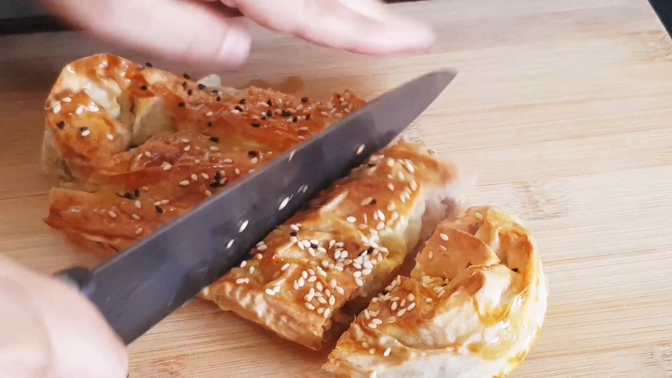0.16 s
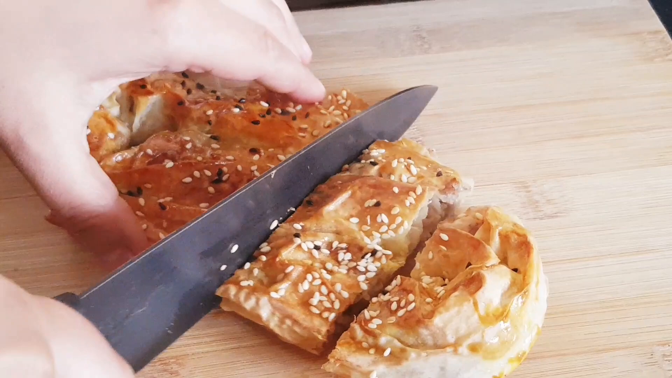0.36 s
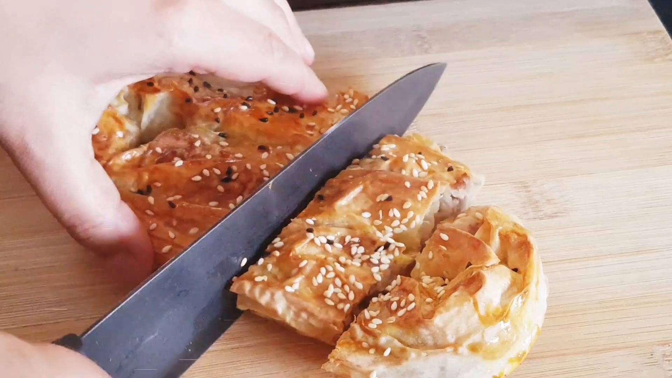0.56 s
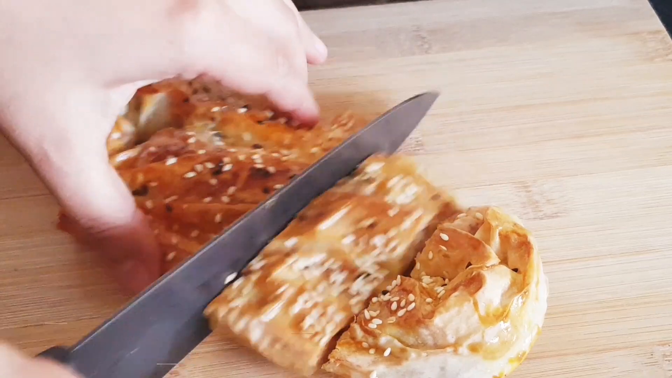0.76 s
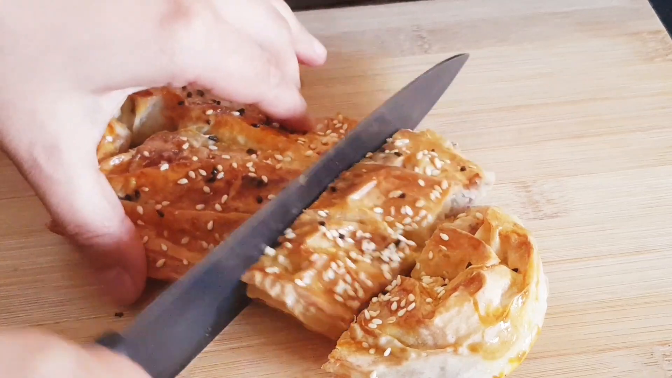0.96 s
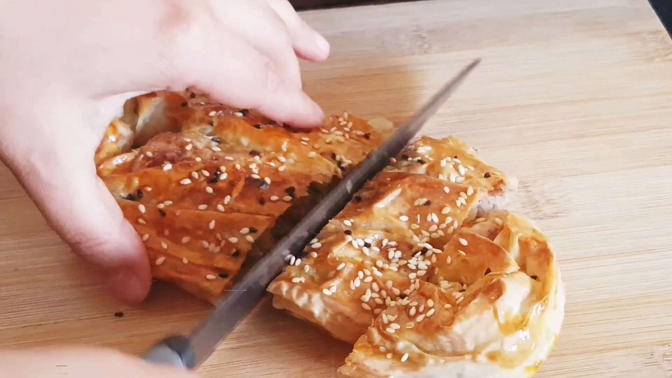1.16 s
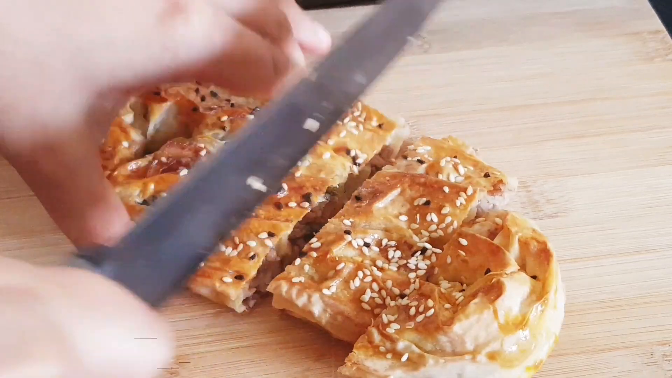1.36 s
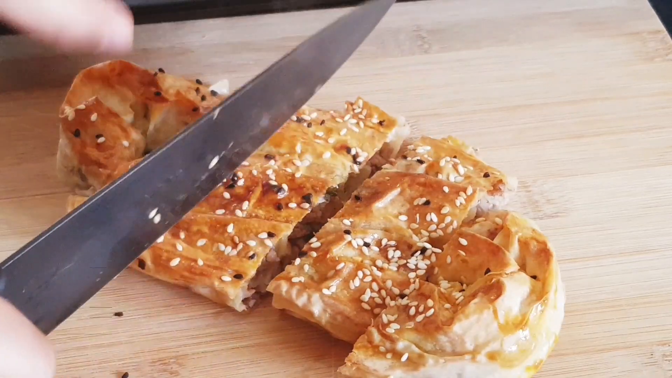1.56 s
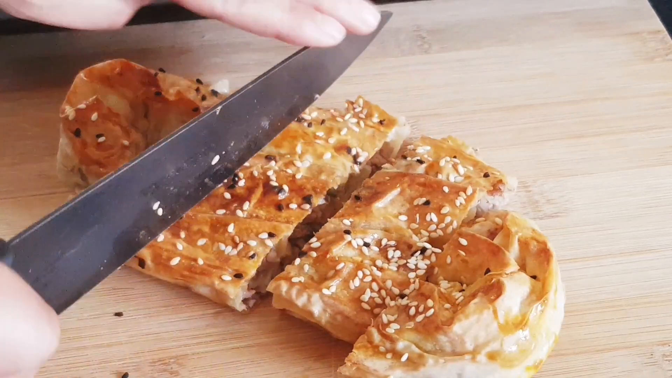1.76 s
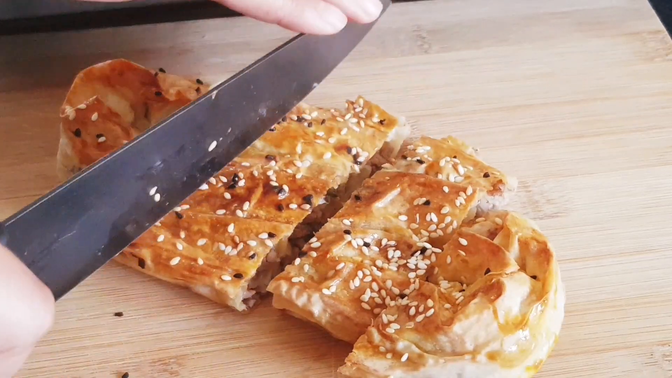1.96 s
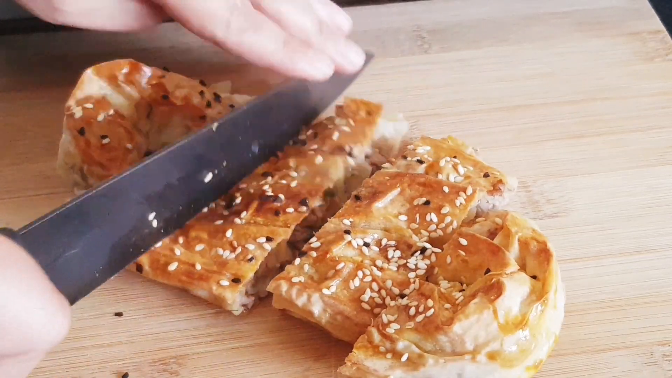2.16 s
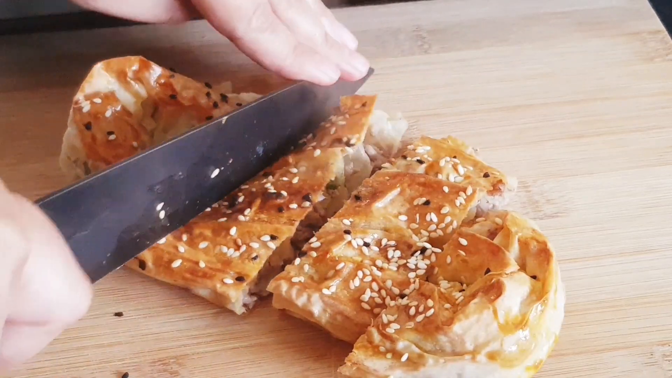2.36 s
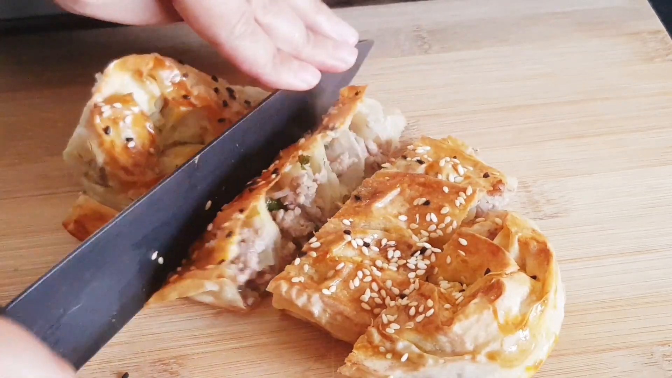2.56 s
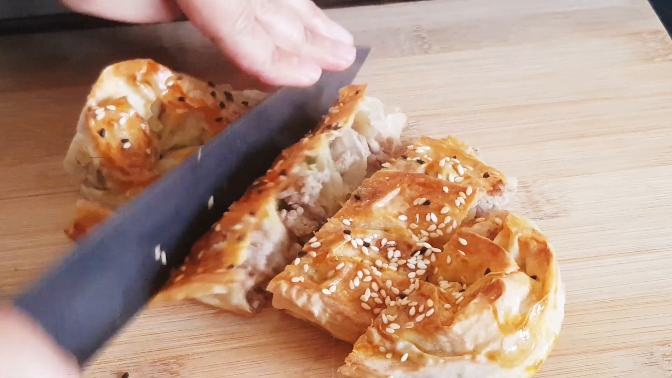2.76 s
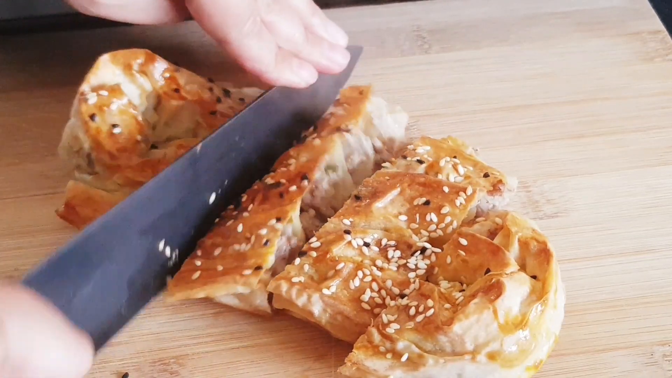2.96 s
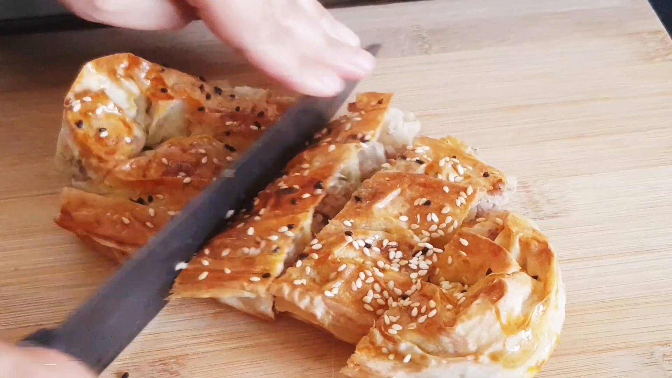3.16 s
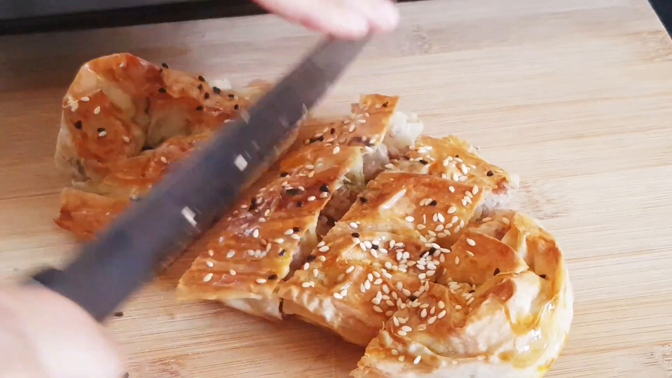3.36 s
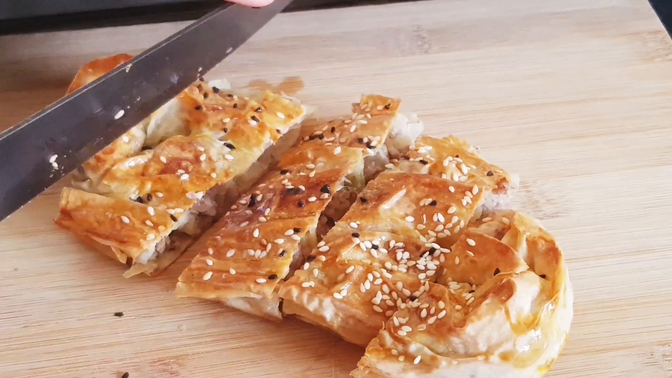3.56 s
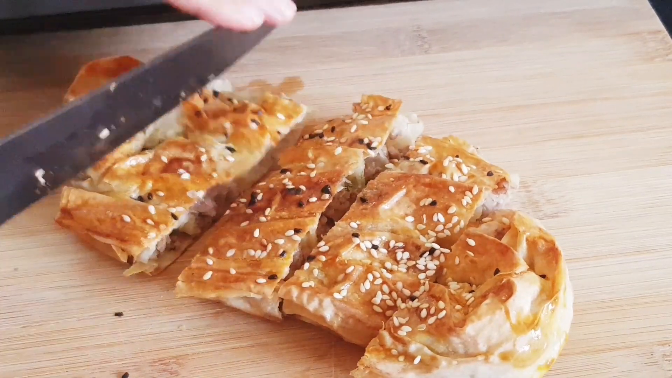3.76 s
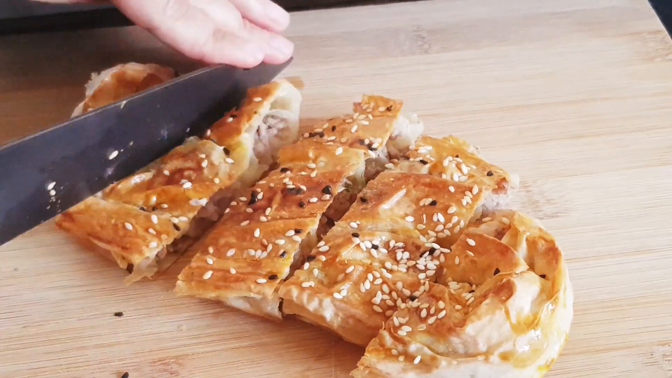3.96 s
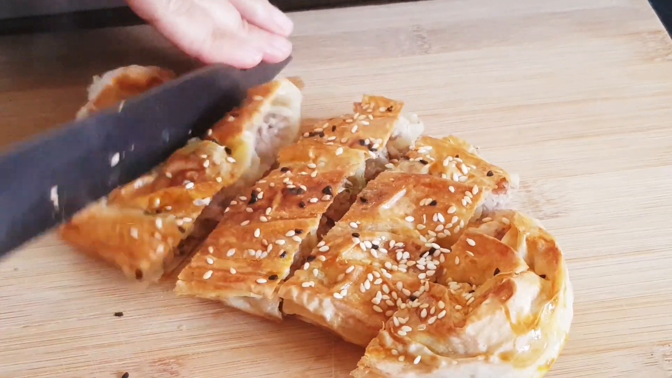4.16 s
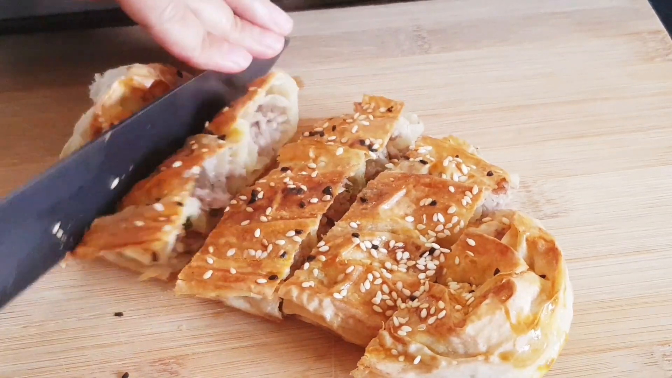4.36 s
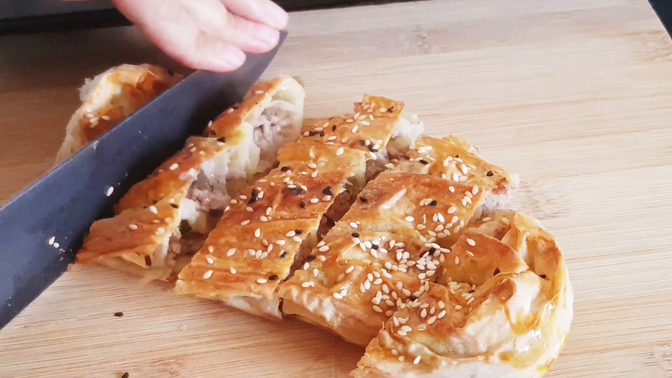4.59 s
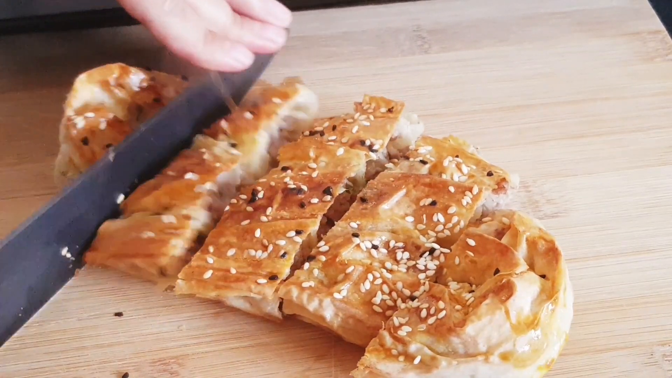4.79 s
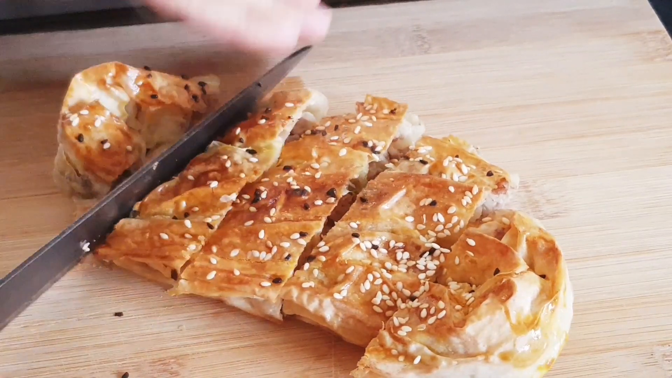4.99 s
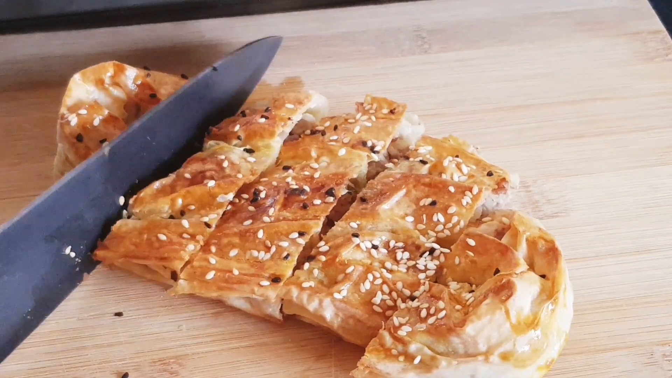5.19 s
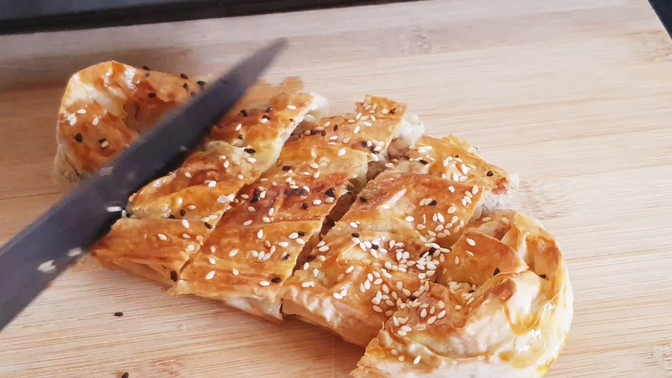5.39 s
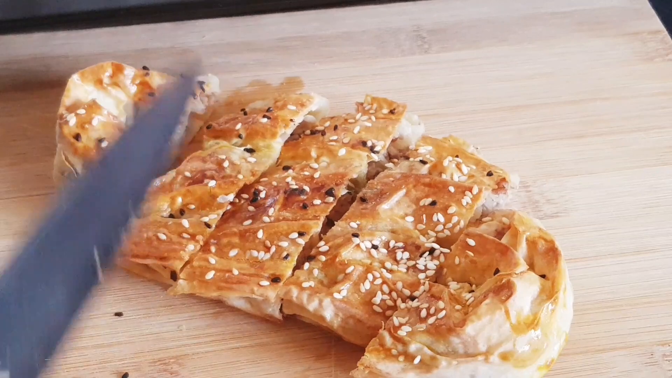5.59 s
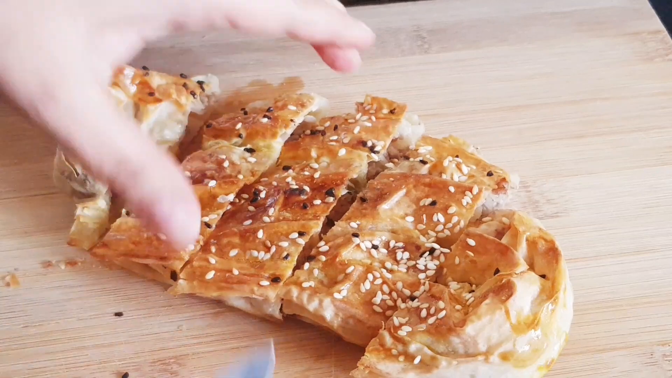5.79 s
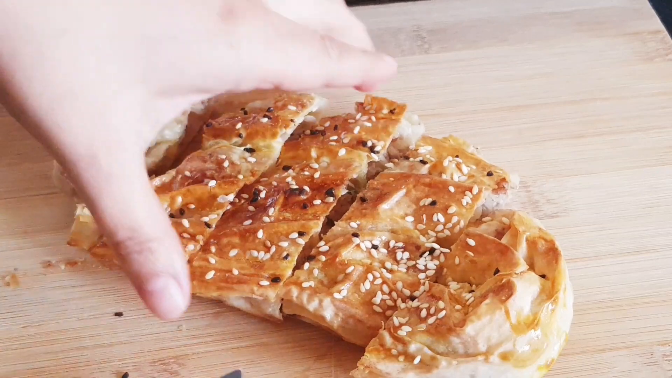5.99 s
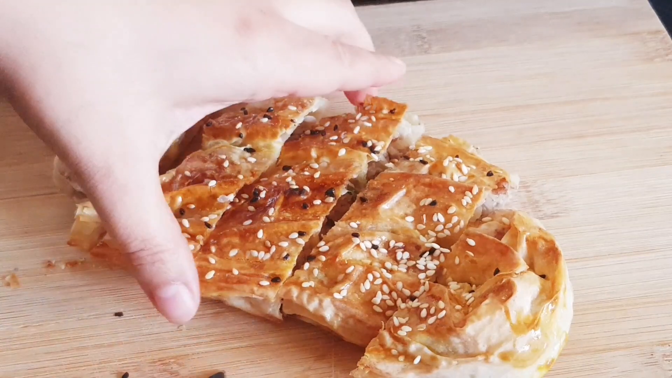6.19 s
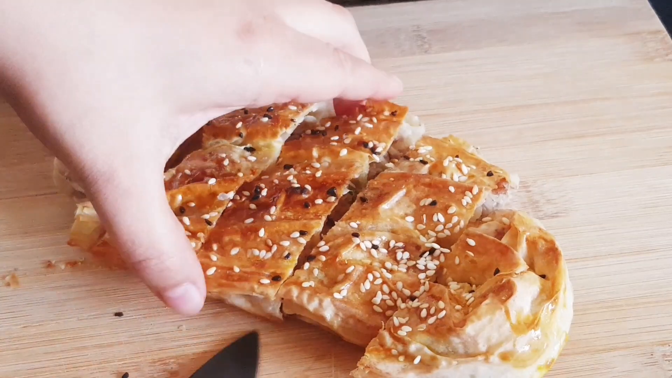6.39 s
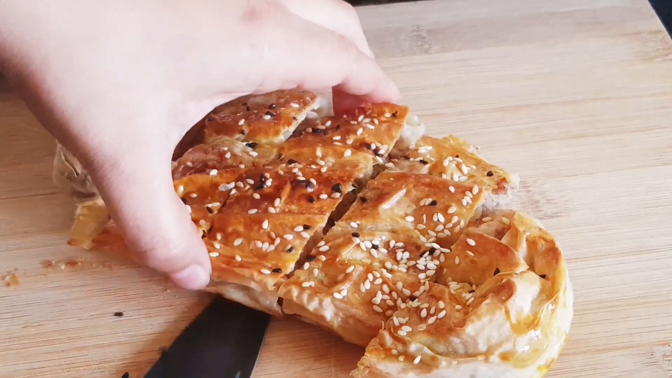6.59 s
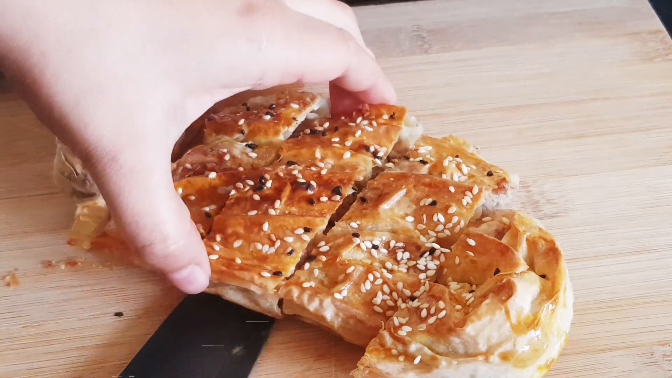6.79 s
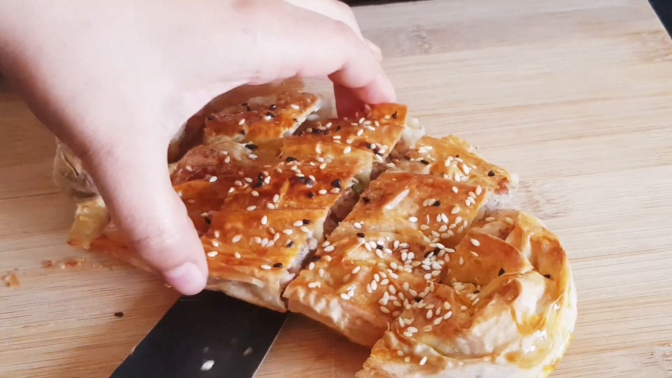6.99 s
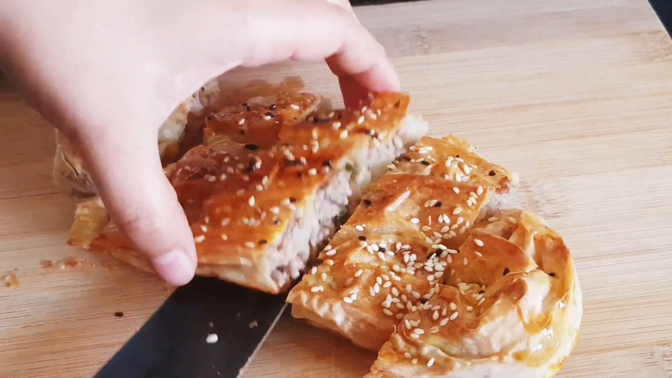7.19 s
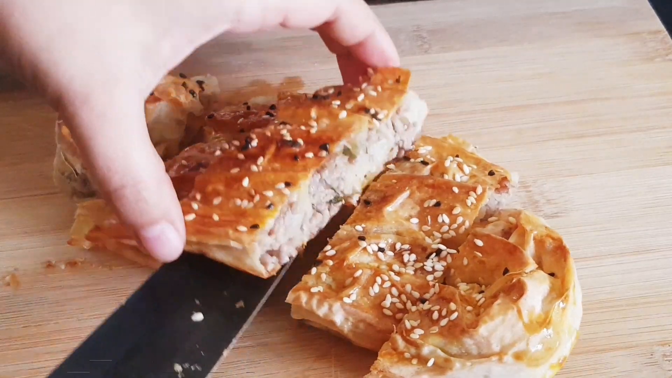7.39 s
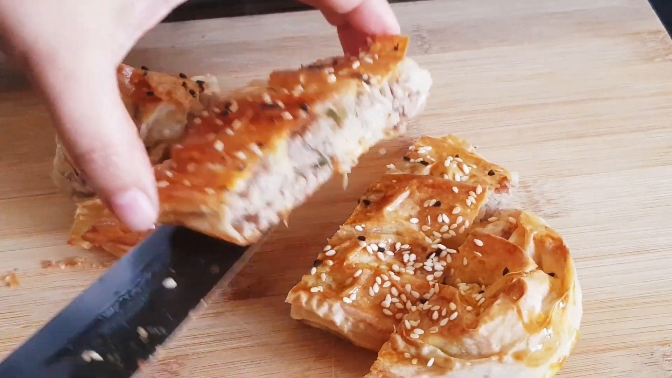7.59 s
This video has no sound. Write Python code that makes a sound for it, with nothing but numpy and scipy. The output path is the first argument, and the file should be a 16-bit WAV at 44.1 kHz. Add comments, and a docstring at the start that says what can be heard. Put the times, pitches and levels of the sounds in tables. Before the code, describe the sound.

A large knife crunches through crisp flaky pastry in three crackling cuts, each ending in a hollow wooden knock, then the blade slides softly.

```python
"""A knife cuts three slices of crisp, flaky pastry on a wooden board, then slides under one to lift it.
Over steady air noise and a wavering low drone, the blade first rubs and a few flakes snap, as filtered noise.
Each push then crushes crust and filling, as trains of random impulses whose level builds until they give.
Each cut ends in a knock on ringing board modes, while dull thuds rock the board on the counter as decaying sines.
Room responses with echoes and a decaying tail surround the pastry, knocks and rubbing, to the last soft slide."""
import sys
import numpy as np
from scipy import signal
from scipy.fft import rfft, irfft, next_fast_len
from scipy.io import wavfile
from scipy.ndimage import uniform_filter1d

SR = 44100
rng = np.random.default_rng(int(sys.argv[2]) if len(sys.argv) > 2 else 0)


def master_out(mix):
    """Clip the mix to full scale and print it as 16-bit PCM to the path in sys.argv[1]."""
    frames = np.transpose(np.atleast_2d(mix))
    ceiling = np.clip(frames, -1, 1)
    pcm = np.round(ceiling * 32767).astype(np.int16)
    wavfile.write(sys.argv[1], SR, pcm)


N = 336924
TIME = np.arange(N) / SR

# spectrum of breaking crust flakes: (frequency [Hz], relative density [dB per Hz])
FLAKE_SPECTRUM = [(200, -36), (1200, -9), (3000, -3.5), (4500, 0), (6800, -0.5), (9000, -5), (12000, 5),
                  (16000, -1.5)]


def amp(db):
    """Level in decibels: 20 dB is a factor of ten in amplitude."""
    return 10 ** (np.asarray(db) / 20)


def unit(x):
    """Power normalisation: scales a signal to rms 1."""
    return x / np.sqrt(np.mean(x ** 2) + 1e-20)


def read(points, hz):
    """Logarithmic interpolation: joins the points of a table on a log-frequency axis."""
    f, value = np.transpose(points)
    return np.interp(np.log(hz + 1), np.log(f + 1), value)


def add(mix, start_s, sound):
    """Superposition: adds a sound into the mix, in place, from a start time."""
    part = mix[max(round(start_s * SR), 0):][:len(sound)]
    part += sound[:len(part)]


def pulse(spectrum, size=2048):
    """Minimum phase: the sharpest causal pulse of energy 1 with this spectrum."""
    hz = abs(np.fft.fftfreq(size, 1 / SR))
    log_gain = np.log(amp(read(spectrum, hz)))
    # the Hilbert transform of the log gain supplies the minimum phase
    response_hz = np.exp(np.conj(signal.hilbert(log_gain)))
    wave = np.fft.ifft(response_hz).real[:size // 2]
    return wave / np.linalg.norm(wave)


def colour(x, spectrum):
    """Causal filtering: gives a signal a spectrum without smearing its attacks backwards."""
    return signal.oaconvolve(x, pulse(spectrum))[:len(x)]


def burst(fade_s, spectrum):
    """Transient noise: a short rush of energy 1 that swells and dies within a few fade_s."""
    t = np.arange(1024) / SR
    noise = rng.standard_normal(len(t))
    wave = colour(noise * t * np.exp(-t / fade_s), spectrum)
    return wave / np.linalg.norm(wave)


def drift(hz):
    """Low-passed noise: slow chance of rms 1, up to about hz changes a second."""
    size = next_fast_len(N, True)
    lowpass = np.exp(-(np.fft.rfftfreq(size, 1 / SR) / hz) ** 2)
    slow = irfft(rfft(rng.standard_normal(size)) * lowpass, size)
    return unit(slow[:N])


def ring(modes):
    """Modal superposition: exponentially decaying sines of alternating sign."""
    t = np.arange(SR // 2) / SR
    out = np.zeros(len(t))
    for k, (hz, db, t60) in enumerate(modes):
        decay = amp(db - t * 60 / max(t60, .01))
        out += (-1) ** k * decay * np.sin(2 * np.pi * hz * t)
    return out


def diffuse(pair):
    """Diffuse-field coherence: two unrelated signals become alike in the bass, as at two close microphones."""
    # likeness of the two channels: (frequency [Hz], coherence [0-1])
    likeness = [(50, 0.87), (140, 0.98), (330, 0.58), (700, 0.35), (1400, .2), (4000, 0.051), (16000, 0.08)]
    a, b = rfft(pair)
    same = np.clip(read(likeness, np.fft.rfftfreq(pair.shape[1], 1 / SR)), 0, 1)
    return irfft([a, same * a + np.sqrt(1 - same ** 2) * b], pair.shape[1])


def grains(per_s, spread_db):
    """Shot noise: random tiny fractures of uneven size, with a fairly steady mean power."""
    level_db = spread_db * np.minimum(rng.exponential(1, N), 4)
    sizes = amp(level_db) * rng.choice([-1, 1], N)
    train = sizes * (rng.random(N) < per_s / SR)
    power = abs(uniform_filter1d(train ** 2, size=900))  # over about 20 ms
    return train / np.sqrt(power + 1e-4)


def drone(waver_hz):
    """Narrow-band modulation: steady sines mixed with randomly wavering ones make an appliance's hum."""
    # partials of the drone: (frequency [Hz], relative rms level [dB], unsteadiness [0-1])
    partials = [(49.7, -49.5, 0.2), (100.1, -58.5, 0.11), (126.7, -75, 0.9), (497, -70.5, 0.8)]
    out = np.zeros(N)
    for hz, db, rough in partials:
        steady = np.sqrt(max(1 - rough ** 2, 0))
        waver = rough * (drift(waver_hz) + 1j * drift(waver_hz)) / np.sqrt(2)
        out += amp(db) * np.sqrt(2) * ((steady + waver) * np.exp(2j * np.pi * hz * TIME)).real
    return out


def background(air_db=-57.5, hum_db=0, waver_hz=9):
    """Stationary noise: still kitchen air as diffuse noise, under the same drone in both channels."""
    # spectrum of the air: (frequency [Hz], relative density [dB per Hz])
    air_spectrum = [(20, -25.5), (60, 2), (110, -1), (180, -5), (260, -10.5), (400, -15.5), (620, -16),
                    (800, -23), (2000, -32.5), (4800, -42.5), (7500, -43), (8800, -49), (12000, -38),
                    (15500, -40)]
    noises = rng.standard_normal((2, N))
    air = diffuse(np.array([colour(noise, air_spectrum) for noise in noises]))
    hum = drone(waver_hz)
    balance = amp([[.6], [-.6]])  # left a little louder
    return (amp(air_db) * unit(air) + amp(hum_db) * hum) * balance


def slides(rub_db=-5, blade_db=-2, per_s=2500, spread_db=3, judder_db=3.0, judder_hz=25):
    """Friction excitation: steel catches on wood grain; the catches hiss and ring the blade, juddering."""
    # flat of the blade rubbing: (start [s], length [s], relative rub level at end [dB], relative ring level [dB])
    slide_events = [(0.073, .11, -67, -90), (1.166, 0.092, -75, -70.5), (6.151, .47, -62.5, -68.5),
                    (6.79, 0.18, -62.5, -87)]
    # resonances of the blade on wood: (frequency [Hz], width [Hz], relative level [dB])
    blade_modes = [(520, 39, 5), (1037, 91, 8), (1576, 78, 0.5), (1850, 130, -15), (2570, 98, -16),
                   (6000, 400, -34), (7400, 520, -17.5)]
    # spectrum of the rubbing: (frequency [Hz], relative density [dB per Hz])
    rub_spectrum = [(200, -21), (600, -15), (1500, 9), (2600, 5), (3500, -6.5), (4500, 0), (6000, -14.5),
                    (7800, -8), (10000, -7), (16000, -11)]
    attack_s, release_s = .015, .064
    swell_db_per_s = 50  # the rubbing grows as more of the blade lies down

    rubbing, ringing, t = np.zeros(N), np.zeros(N), TIME[:SR]
    for start, length, end_db, ring_db in slide_events:
        contact = np.minimum(t / attack_s, 1) * np.exp(-np.maximum(t - length, 0) / release_s)
        swell = amp(end_db - swell_db_per_s * np.maximum(length - t, 0))
        add(rubbing, start, contact * swell)
        add(ringing, start, contact * amp(ring_db))

    catches = grains(per_s, spread_db)
    hz = np.fft.rfftfreq(N, 1 / SR)
    steel = sum(amp(db) / (1 + 1j * (hz ** 2 - f ** 2) / (width * hz + 1)) for f, width, db in blade_modes)
    hiss = amp(rub_db) * colour(catches, rub_spectrum) * rubbing
    sing = amp(blade_db) * unit(irfft(rfft(catches) * steel, N)) * ringing
    return (hiss + sing) * amp(judder_db * drift(judder_hz))


def snaps(crack_db=0, jolt_db=1, fade_s=.00026, vary_db=2.6):
    """Brittle fracture: a crack runs through a flake in about a millisecond and jolts the pastry beneath."""
    # single flake snaps, loud and faint, and a soft push at 2.98 s:
    # (time [s], relative crack energy [dB], relative jolt energy [dB])
    snap_events = [(0.0734, -29, -53.5), (0.3183, -28, -30), (0.5172, -19.5, -46), (0.5404, -18, -28),
                   (0.649, -18.5, -47), (0.6578, -20, -47), (0.6802, -11.5, -23), (0.8609, -19, -30),
                   (1.2917, -38, -46), (1.9708, -15.5, -20), (2.054, -18.5, -47.5), (2.0685, 2.5, -8),
                   (2.0806, -11, -22), (2.095, -5.5, -34.5), (2.1057, -6.5, -22), (2.1508, -7, -20),
                   (2.1799, -8.5, -35.5), (2.366, -12, -27), (2.3978, -9.5, -28.5), (2.411, -4.5, -34.5),
                   (2.4241, -6, -35.5), (2.4504, -17, -42), (2.4637, -6.5, -25), (2.4911, -17.5, -16.5),
                   (2.6858, -15.5, -33.5), (2.723, -20, -28.5), (2.9828, -32.5, -21), (3.2639, -35.5, -42),
                   (3.7124, -50, -27.5), (3.787, -21, -21.5), (3.8478, -8, -25), (3.86, -18, -30),
                   (3.8797, -5.5, -30), (3.8937, -12.5, -26.5), (3.9072, -5, -15.5), (3.931, -13.5, -38),
                   (4.049, -35, -36.5), (4.1526, -10.5, -32), (4.16, -6.5, -22.5), (4.1795, 3, -18),
                   (4.1884, -1.5, -14), (4.206, -3, -19), (4.2299, -13.5, -31), (4.2588, -8.5, -27),
                   (4.3597, -29, -47), (4.4946, -13, -28), (4.4997, -7, -16.5), (4.7462, -20, -30),
                   (4.9076, -34, -49), (6.7445, -33, -60), (7.1139, -34.5, -51)]
    # spectrum of the jolt: (frequency [Hz], relative density [dB per Hz])
    jolt_spectrum = [(80, -22), (400, -14.5), (900, 4), (1400, 7.5), (2100, 1), (3500, -13.5), (7000, -24),
                     (16000, -40.5)]
    out = np.zeros(N)
    for s, crack, jolt in snap_events:
        # each flake snaps with its own tone colour
        own = [(hz, db + vary_db * rng.standard_normal()) for hz, db in FLAKE_SPECTRUM]
        add(out, s, amp(crack + crack_db) * burst(fade_s, own))
        add(out, s, amp(jolt + jolt_db) * pulse(jolt_spectrum))
    return out


def pressure():
    """Loading to failure: gains of crust and inside build with each push until the pastry gives, then fall."""
    # pushes: (start [s], time until it gives [s], release [s], relative crust level [dB],
    # relative inside level [dB])
    crush_events = [(0.45, 0.015, 0.093, -56, -51), (0.53, 0.058, 0.033, -53, -47.5),
                    (0.676, 0.042, 0.034, -52.5, -36.5), (0.81, 0.04, 0.019, -44, -36),
                    (1.002, 0.02, 0.035, -66, -50), (1.963, 0.0093, 0.14, -63, -52.5),
                    (2.039, 0.057, 0.087, -49, -52.5), (2.355, 0.061, 0.046, -36, -41.5),
                    (2.49, 0.041, 0.18, -65, -53), (2.729, 0.021, 0.018, -38, -30),
                    (3.787, .012, 0.079, -71.5, -61.5), (3.876, 0.036, 0.08, -53.5, -41),
                    (4.146, 0.067, 0.056, -25.5, -35.5), (4.461, 0.035, 0.081, -46.5, -41.5),
                    (4.742, 0.019, .02, -50, -52), (6.16, 0.016, 0.11, -88, -67),
                    (6.6, 0.062, .06, -63, -71), (6.86, 0.097, .08, -72, -72), (7.11, .02, .06, -63.5, -78)]
    build_db, release_db = -12, -17  # start relative to the peak, and change in each release time
    bite_s = .007  # the edge takes hold
    crust, inside, t = np.zeros(N), np.zeros(N), TIME[:SR // 2]
    for start, build, release, crust_db, inside_db in crush_events:
        loading_db = build_db * np.maximum(1 - t / build, 0)
        unloading_db = release_db * np.maximum(t - build, 0) / release
        push = np.minimum(t / bite_s, 1) * amp(loading_db + unloading_db)
        add(crust, start, amp(crust_db) * push)
        add(inside, start, amp(inside_db) * push)
    return crust, inside


def crunch(crust_db=0, inside_db=1, flakes_db=-5, crust_per_s=1500, inside_per_s=1200, flakes_per_s=120,
           spread_db=4, clump_db=2.0):
    """Cumulative microfracture: thin crust crumbles and sheds small flakes, while the inside tears more dully."""
    # spectra of crust and inside: (frequency [Hz], relative density [dB per Hz])
    crust_spectrum = [(200, -37), (1000, -19.5), (2500, -4.5), (4000, -2), (5200, -0.5), (6800, -6),
                      (8800, -6.5), (11000, 2.5), (13000, -3.5), (15800, -1)]
    inside_spectrum = [(80, -16.5), (250, -5), (480, -4), (680, -4), (950, -2.5), (1400, -1.5), (2200, -6),
                       (3500, -8.5), (7000, -20), (16000, -40)]
    on_crust, on_inside = pressure()
    # the edge catches and gives, layer by layer
    clumps = unit(amp(clump_db * np.clip(drift(98), -2, 1.5)))
    crust = amp(crust_db) * colour(grains(crust_per_s, spread_db), crust_spectrum)
    flakes = amp(flakes_db) * colour(grains(flakes_per_s, spread_db), FLAKE_SPECTRUM)
    inside = amp(inside_db) * colour(grains(inside_per_s, spread_db), inside_spectrum)
    return clumps * ((crust + flakes) * on_crust + inside * on_inside)


def knocks(tick_s=0.0008):
    """Impact excitation: the edge hits wood with a hollow blow, the board's modal ring and a steel tick."""
    # landings: (time [s], relative blow level [dB], tick relative to blow [dB], ring relative to blow [dB])
    knock_events = [(0.8286, -1.5, -24.5, -11), (2.743, 4.5, -14, -7), (4.773, 9, -24, -6.5),
                    (6.165, -44.5, -21, 12.5)]
    # modes of the board: (frequency [Hz], relative level [dB], t60 [s])
    board_modes = [(287.7, -9, 0.75), (384, -3, 0.083), (480, 0.5, 0.23), (574.2, -2, 0.22),
                   (720, -1.5, 0.38), (788, -1, 0.34), (854, -0.5, .2), (921, -6, .16), (1003, -1, 0.053),
                   (1085, -1, .18), (1160, 10, 0.11), (1260, 0, 0.14), (1300, -3, .16), (1400, -4, .12),
                   (1644, -5, 0.036), (1890, -13, 0.09)]
    # spectrum of the blow: (frequency [Hz], relative density [dB per Hz])
    blow_spectrum = [(60, -25), (250, -7.5), (480, -7.5), (680, -7), (950, -4), (1300, -1.5), (1650, -8.5),
                     (1950, -14), (2300, -30.5), (3000, -34.5), (5000, -51.5), (16000, -71)]
    # spectrum of the tick: (frequency [Hz], relative density [dB per Hz])
    steel = [(200, -29), (2500, -8.5), (3800, 0.5), (5000, 3.5), (8000, -6.5), (12000, -0.5), (16000, -3.5)]
    out, wood = np.zeros(N), ring(board_modes)
    for s, db, tick, ringing in knock_events:
        add(out, s, -amp(db) * pulse(blow_spectrum))
        add(out, s, amp(db + ringing) * wood / np.linalg.norm(wood))
        add(out, s, amp(db + tick) * burst(tick_s, steel))
    return out


def thuds(thud_db=-3, rise_s=.005, count=3):
    """Damped rebound: the board rocks on the counter's modes, each rebound weaker and duller."""
    # dull pushes: (time [s], relative level [dB], relative deep part [dB], relative woody part [dB],
    # change per rebound [dB])
    thud_events = [(0.83, -37, 0, -5, -4), (1.017, -44, 8, -20, -9), (2.184, -38, -7.5, 8, -13.5),
                   (2.744, -25.5, 1, -0.5, -4), (2.982, -28, -6.5, -6.5, -7),
                   (3.939, -35.5, -5.5, 4.5, -12), (4.23, -37, 0, 0.5, -3),
                   (4.564, -34.5, -11.5, -0.5, -15.5), (4.754, -31.5, -5, -1.5, -9),
                   (6.165, -43.5, -15, 1.5, -2)]
    # modes of the counter: (frequency [Hz], relative level [dB], t60 [s])
    counter_modes = [(65.3, 1, .33), (97, -1.5, 0.3), (144, -0.5, 0.24), (163.4, -8.5, 0.47),
                     (202.5, -5.5, 0.21), (251, -10, 0.12), (278, -6.5, 0.13), (352, -8.5, .12),
                     (476, -10, 0.14)]
    rock_s, dulling_db = .056, -1.5  # time between rebounds, and change of the woody part with each
    out = np.zeros(N)
    for s, db, deep, woody, rebound_db in thud_events:
        for k in range(count):
            push = [(90, deep), (130, 0), (210, 0), (300, woody + k * dulling_db)]  # (Hz, dB)
            boom = ring([(hz, d + read(push, hz), t60) for hz, d, t60 in counter_modes])
            rise = 1 - np.exp(-TIME[:len(boom)] / rise_s)
            add(out, s + k * rock_s, amp(db + thud_db + k * rebound_db) * boom * rise)
    return out


def response(tail_db, scatter_db, left_db, lead_s, build_s=.004, scatter_s=.0011):
    """Room impulse response: direct sound, echoes, scatter and tail at two microphones, the left one nearer."""
    # reverberation: (frequency [Hz], t60 [s])
    decay_times = [(100, .45), (400, .45), (1200, .39), (3000, .39), (6000, .44), (11000, .39),
                   (16000, .31)]
    # near surfaces: (nominal delay [s], level relative to the unscaled direct sound [dB])
    echo_paths = [(.0019, -6.5), (.0039, -10), (.0098, -9.5), (.0122, -10.5), (.0185, -16)]
    # spectrum of the scatter: (frequency [Hz], relative density [dB per Hz])
    scatter_spectrum = [(200, -27.5), (1200, -6), (3000, -1), (11000, 1.5), (16000, -9), (20000, -22)]
    t = np.arange(SR * 3 // 4) / SR

    hz, when, bands = signal.stft(diffuse(rng.standard_normal((2, len(t)))), SR, nperseg=256)
    decay = amp(-60 * when / read(decay_times, hz)[:, None])
    tail = signal.istft(bands * decay, SR, nperseg=256)[1][:, :len(t)]
    tail = tail * (1 - np.exp(-t / build_s))

    # blade, hands and board scatter the short waves at once
    envelope = t * np.exp(-t / scatter_s)
    noises = rng.standard_normal((2, len(t)))
    scatter = np.array([colour(noise * envelope, scatter_spectrum) for noise in noises])

    path = np.zeros((2, len(t)))
    for db, part in [(tail_db, tail), (scatter_db, scatter)]:
        path += amp(db) * part / np.linalg.norm(part, axis=1, keepdims=True)
    path = path * amp([[left_db / 2], [-left_db / 2]])
    add(path[0], 0, amp([left_db]))
    add(path[1], lead_s, amp([-left_db]))
    for k, (delay, db) in enumerate(echo_paths):  # surfaces lie to the left and right in turn
        delay = delay * rng.uniform(.9, 1.1)
        add(path[k % 2], delay, amp([db]))
        add(path[1 - k % 2], delay + .0003, amp([db]))
    return path


def kitchen(x, path):
    """Linear room acoustics: convolves a sound with the impulse response of its path."""
    return signal.fftconvolve(x[None], path, axes=1)[:, :N]


def spots(x, count, per_s=55):
    """Equal-power panning: the break moves among a few spots along the blade, crossfading in rotation."""
    place = np.cumsum(per_s * (1 + .5 * drift(20))) / SR  # counted in spots
    away = [abs((place - k) % count - count / 2) for k in range(count)]
    return [x * np.cos(np.pi / 2 * np.minimum(d, 1)) for d in away]


def scene(pastry_db=-5.0):
    """Superposition: pastry, knocks and rubbing sound through the room; thuds and background add directly."""
    rubbing = kitchen(slides(), response(tail_db=-4.0, scatter_db=-30, left_db=3.0, lead_s=.00013))
    cutting = amp(pastry_db) * (snaps() + crunch())
    pastry = np.zeros((2, N))
    for x in spots(cutting, count=6):
        pastry += kitchen(x, response(tail_db=-1, scatter_db=-7, left_db=2, lead_s=.00013))
    wood = kitchen(knocks(), response(tail_db=-2, scatter_db=-9, left_db=1.2, lead_s=.00011))
    rocking = thuds() * amp([[.4], [-.4]])
    return background() + rubbing + pastry + wood + rocking


def record(dry, edge_hz=16050):
    """Band limitation: a linear-phase low-pass filter removes the highest treble."""
    lowpass = signal.firwin(401, edge_hz, window=("kaiser", 8), fs=SR)
    return signal.oaconvolve(dry, lowpass[None], "same")


dry = scene()
out = record(dry)
master_out(out)
```